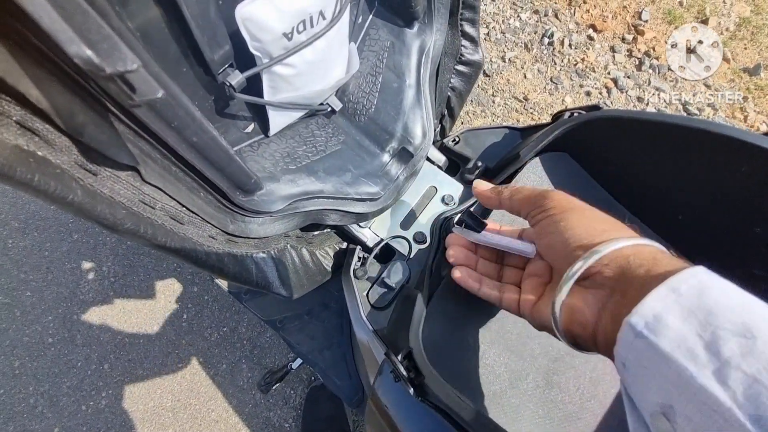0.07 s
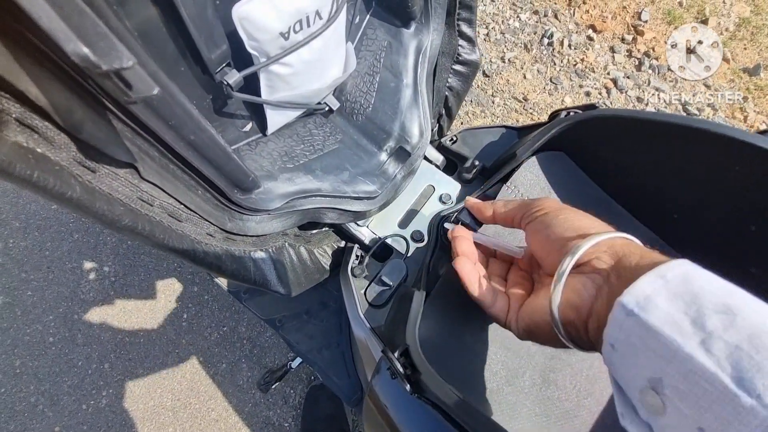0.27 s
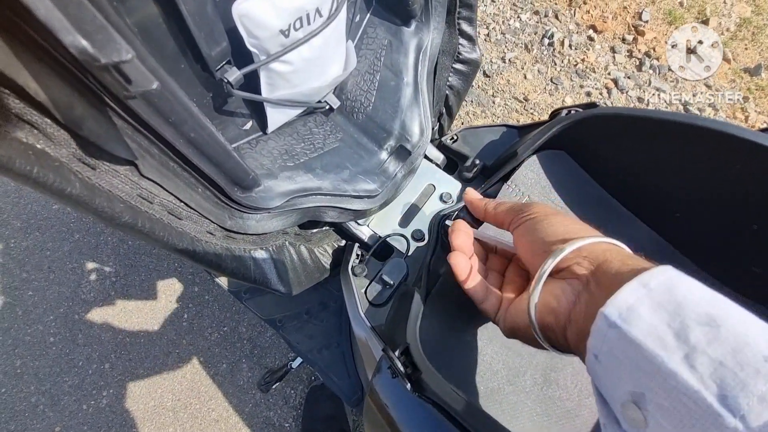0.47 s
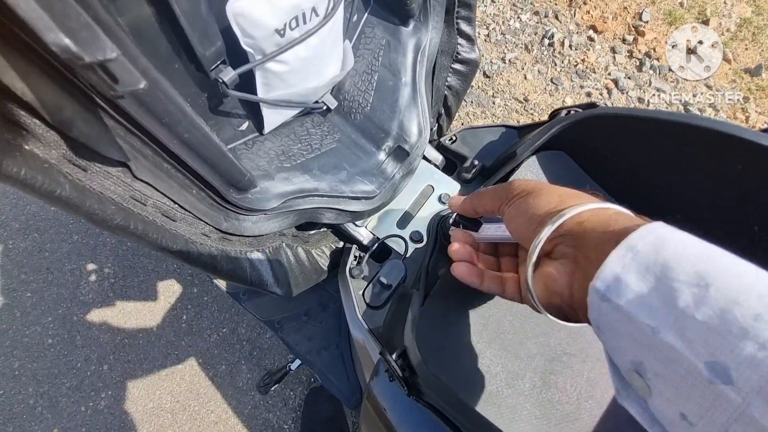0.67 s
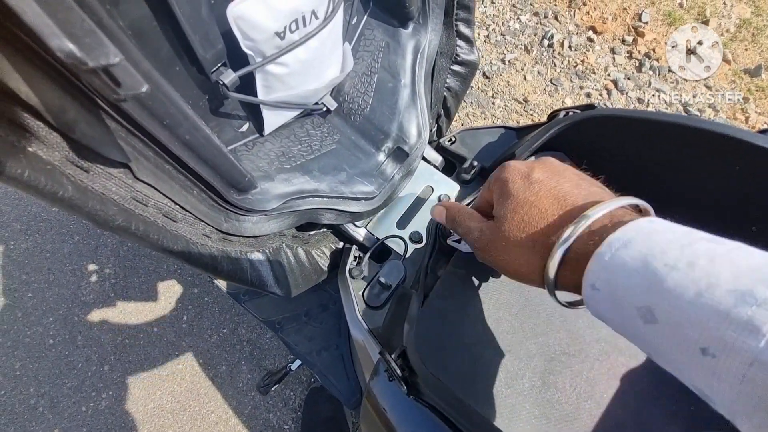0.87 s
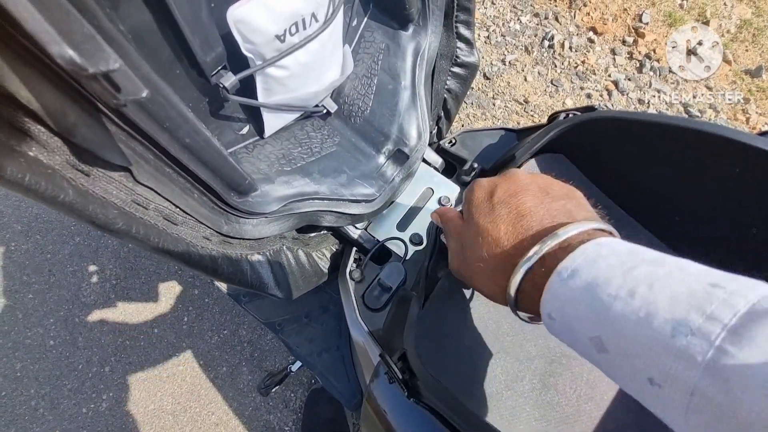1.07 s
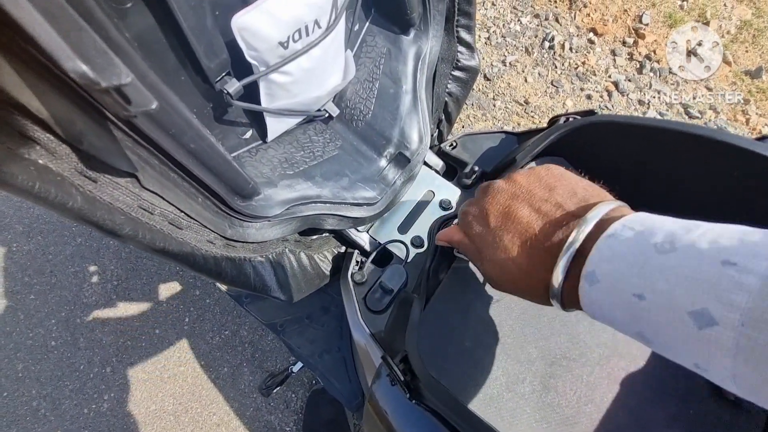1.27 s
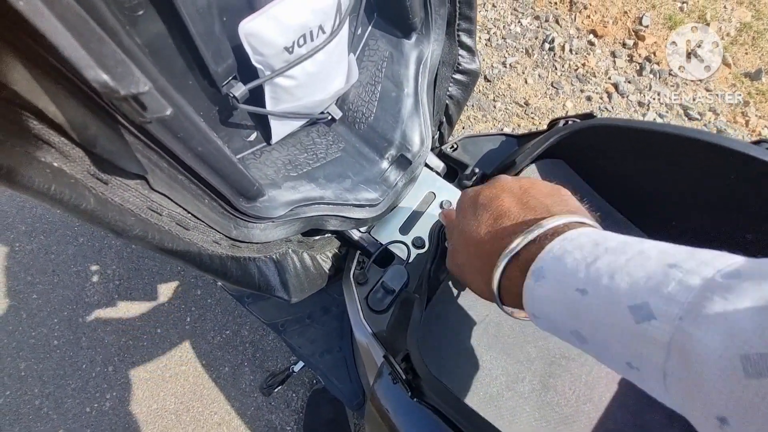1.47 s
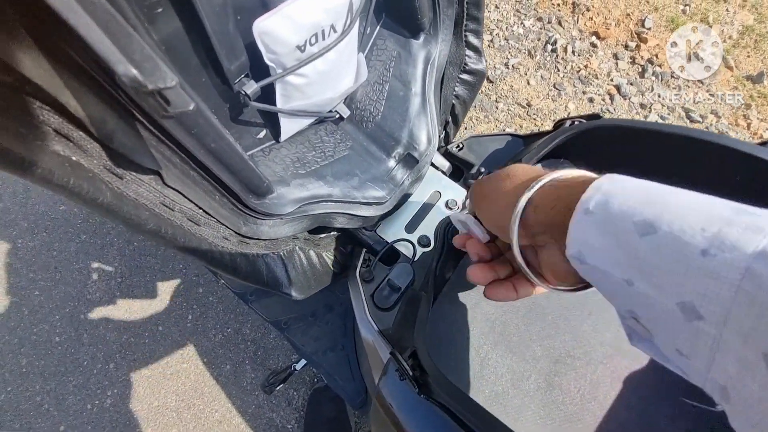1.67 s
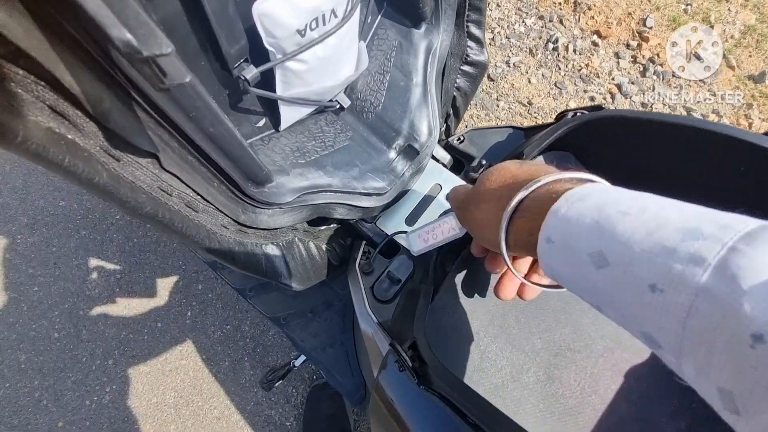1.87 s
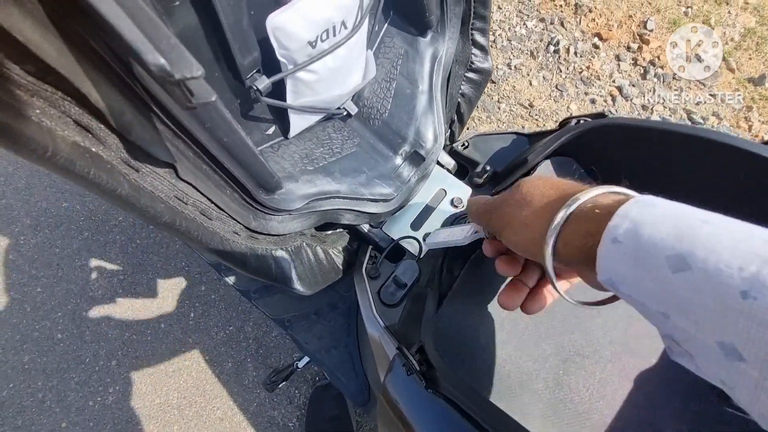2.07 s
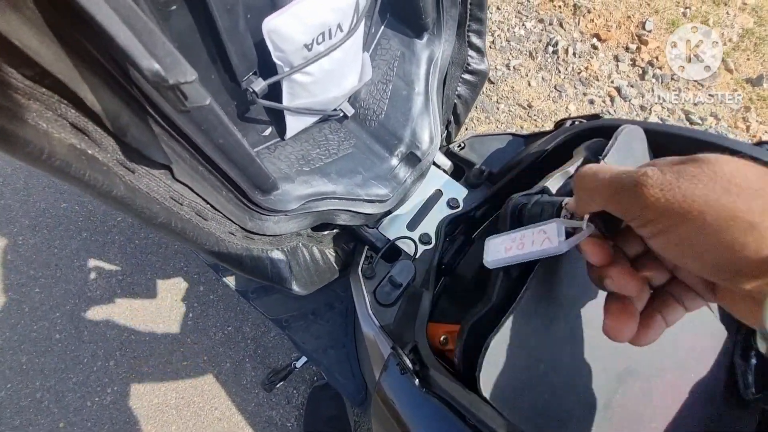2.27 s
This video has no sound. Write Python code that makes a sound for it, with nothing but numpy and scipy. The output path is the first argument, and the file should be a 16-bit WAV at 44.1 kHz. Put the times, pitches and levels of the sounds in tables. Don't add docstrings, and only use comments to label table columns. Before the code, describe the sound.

A metal key clicks and scrapes into a small lock on a scooter, each push thumping the hollow plastic box; it turns, slides out, and a latch clacks loudly near the end, close up outdoors over low traffic rumble.

```python
import sys
import numpy as np
from scipy import signal
from scipy.io import wavfile

SR = 44100
rng = np.random.default_rng(int(sys.argv[2]) if len(sys.argv) > 2 else 0)


def gain_from_db(level_db):
    decades = np.asarray(level_db, float) / 20
    return 10 ** decades


def output_pcm(signal):
    pcm = np.clip(np.atleast_2d(signal).T, -1, 1) * 32767
    wavfile.write(sys.argv[1], SR, np.round(pcm).astype(np.int16))


N = 102267
OPPOSITE = np.array([[1], [-1]])


def rms_one(x):
    return x / np.sqrt(np.mean(x ** 2) + 1e-20)


def at_hz(points, hz):
    table_hz, values = np.transpose(points)
    return np.interp(np.log(hz), np.log(table_hz), values)


def drift(rate_hz):
    step = 40
    warmup = 2000
    r = np.exp(-2 * step * np.pi * rate_hz / SR)
    white = rng.standard_normal(N // step + warmup + 2)
    slow = rms_one(signal.lfilter([1], [1, -2 * r, r * r], white)[warmup:])
    return np.interp(np.arange(N) / step, np.arange(len(slow)), slow)


def resonance(x, hz, width_hz):
    r = np.exp(-np.pi * width_hz / SR)
    feedback = [1, -2 * r * np.cos(2 * np.pi * hz / SR), r * r]
    return signal.lfilter([(1 - r * r) / 2, 0, (r * r - 1) / 2], feedback, x + 1e-18)


def bandpass(x, low_hz, high_hz, order=3):
    return signal.sosfilt(signal.butter(order, [low_hz, high_hz], "band", fs=SR, output="sos"), x)


def struck(start_s, rise_s, t60_s):
    i = int(start_s * SR)
    t = np.arange(min(N - i, int(t60_s * SR) + 200)) / SR
    shape = (1 - np.exp(-t / rise_s)) ** 2 * gain_from_db(-60 * t / t60_s)
    return slice(i, i + len(t)), t, shape / shape.max()


def swell(peak_s, rise_s, fall_s, bend):
    first = max(int((peak_s - 4 * rise_s) * SR), 0)
    n = np.arange(first, min(int((peak_s + 8 * fall_s) * SR), N))
    t = n / SR - peak_s
    return n, t, gain_from_db(-6 * np.where(t < 0, (t / rise_s) ** 2, (np.abs(t) / fall_s) ** bend))


def grains():
    grains_per_s = 14000
    sizes = gain_from_db(2.2 * np.minimum(rng.exponential(1, (3, N)), 4))
    left, right, shared = rng.standard_normal((3, N)) * sizes * (rng.random((3, N)) < grains_per_s / SR)
    return np.array([left, right]) + .5 * np.array([shared, np.roll(shared, 16)])


# pitch_hz, likeness (0 to 1)
SIDE_LIKENESS = [(40, .74), (290, .9), (640, .2), (1400, 0)]


def banded(white, spectrum, patchy_db):
    out = 0
    edges = np.append(25 * 2 ** np.arange(0, 9.1, .5), 17000)
    for k, (low, high) in enumerate(zip(edges, edges[1:])):
        mid, side = bandpass(white[k % 2], low, high, order=2)
        hz = np.sqrt(low * high)
        alike = np.clip(at_hz(SIDE_LIKENESS, hz), 0, 1)
        stereo = np.sqrt(1 + alike) * mid + np.sqrt(1 - alike) * side * OPPOSITE
        out = out + gain_from_db(at_hz(spectrum, hz) + patchy_db * drift(1.1)) * stereo
    return rms_one(out)


# pitch_hz, level_db (per Hz)
STREET_TONE = [(25, -6), (60, 8.5), (110, 2), (180, -23.5), (400, -11.5), (650, -54), (1500, -76),
               (16000, -33.5)]


def street(grip_change_db):
    rumble = banded(rng.standard_normal((2, 2, N)), STREET_TONE, patchy_db=1.0)
    return gain_from_db(-49 + 0.31 * grip_change_db) * rumble


def far_squeal():
    squeal_hz, width_hz, start_s, end_s, level_db = 2700, 12, .985, 1.2, -75
    t = np.arange(N) / SR
    on = np.clip((t - start_s) / .02, 0, 1) * np.clip((end_s - t) / .05, 0, 1)
    once = resonance(rng.standard_normal((2, N)), squeal_hz, width_hz)
    return gain_from_db(level_db) * on * rms_one(resonance(once, squeal_hz, width_hz))


def bird_chirp():
    middle_s, pitch_hz, rise_hz_per_s, level_db = 1.075, 4930, 10500, -80
    u = np.arange(N) / SR - middle_s
    turns = pitch_hz * u + rise_hz_per_s * u ** 2 / 2
    return gain_from_db(level_db) * np.exp(-(u / .065) ** 4) * np.sin(2 * np.pi * turns)


# pitch_hz, level_db (per Hz)
RUSTLE_TONE = [(600, 7), (1300, 0), (2700, -3.5), (7500, -8.5), (15500, -19)]


def hand_rustle(grip_db):
    rub = banded(rng.standard_normal((2, 2, N)), RUSTLE_TONE, patchy_db=-1.0)
    return gain_from_db(4.5 + grip_db) * rms_one(bandpass(rub, 500, 17000, order=2))


def hand_creak(grip_change_db):
    return gain_from_db(0.56 * grip_change_db - 54.5 + 1.0 * drift(25))


# start_s, length_s, level_db, bright_db (added to the bright part)
SCRAPE_STROKES = [(0, 0.2, -49, -16), (0.119, 0.077, -46, 9), (0.297, 0.053, -57, 10.5),
                  (0.939, 0.067, -46.5, 7.5), (1.276, 0.039, -34.5, 5.5), (1.942, 0.089, -34.5, 4),
                  (2.137, 0.086, -35, 10)]
# pitch_hz, level_db (per Hz)
SLIDE_TONE = [(700, 6), (2400, -0.5), (7000, -15.5), (15500, -25)]


def scrapes():
    t = np.arange(N) / SR
    dull_level, bright_level = np.zeros(N), np.zeros(N)
    for start_s, length_s, db, bright_db in SCRAPE_STROKES:
        fade_in = np.clip((t - start_s) / 0.0024, 0, 1)
        fade_out = np.clip((start_s + length_s - t) / 0.026, 0, 1)
        weaken_db = -15.4 * np.clip((t - start_s) / length_s, 0, 1)
        stroke = gain_from_db(db + weaken_db) * fade_in * fade_out
        dull_level += stroke
        bright_level += gain_from_db(bright_db) * stroke
    slide = banded(np.array([grains(), grains()]), SLIDE_TONE, patchy_db=2.0)
    split_hz = 3200
    dull = signal.sosfilt(signal.butter(2, split_hz, fs=SR, output="sos"), slide)
    bright = signal.sosfilt(signal.butter(2, split_hz, "high", fs=SR, output="sos"), slide)
    return gain_from_db(2.0 * drift(150)) * (dull_level * dull + bright_level * bright)


# pitch_hz, first_blow_db, second_blow_db, t60_s
LATCH_MODES = [(823, -3.5, -6.5, 0.029), (1063, -8.5, -4, .03), (1550, -10, -2, 0.028),
               (1717, 1.5, 3.5, 0.019), (2000, 5.5, -2, 0.013), (2700, -12.5, -16.5, 0.036)]
# hit_s, level_db
LATCH_BLOWS = [
    (2.1405, -7),
    (2.1552, -7),
]


def latch():
    out = np.zeros((2, N))
    for hz, *levels_db, t60_s in LATCH_MODES:
        for (hit_s, db), level_db in zip(LATCH_BLOWS, levels_db):
            span, t, shape = struck(hit_s - .0015, .0016, t60_s)
            side_db = rng.normal(0, 2.4, (2, 1))
            turns = hz * t + rng.random()
            lag_turns = np.array([[0], [rng.uniform(0.081, 0.42)]])
            ring = np.sin(2 * np.pi * (turns + lag_turns))
            out[:, span] += gain_from_db(db + level_db - 7.0 + side_db) * shape * ring
    return out * gain_from_db([[-1.5], [1.5]])


# peak_s, plastic_db, lock_db, blade_db,
# length_s
KEY_TICKS = [(0.048, -48, -69, -73, 0.0018), (0.079, -47, -61, -76, 0.003),
             (0.1193, -54, -53, -56, 0.0041), (0.1269, -55, -44, -62, 0.0016),
             (0.1405, -49, -44.5, -48, 0.003), (0.147, -35, -43.5, -37, 0.0038),
             (0.2736, -55, -56.5, -62, 0.0032), (0.2901, -84, -76, -57, 0.0046),
             (0.5975, -46, -53, -60.5, 0.0037), (0.606, -61, -76, -76, 0.0016),
             (0.6656, -54.5, -32.5, -23, 0.0014), (0.7318, -45.5, -51, -72, 0.0021),
             (0.8814, -72, -60, -62, 0.0028), (0.9086, -41.5, -40.5, -51, 0.0013),
             (0.9195, -47, -63, -66, 0.009), (0.9298, -44, -45.5, -49, 0.0037),
             (0.9404, -52, -49, -57, 0.0023), (0.95, -44, -50.5, -53, 0.0069),
             (1.1188, -46.5, -74, -77, 0.0051), (1.2083, -38, -65, -57.5, 0.0031),
             (1.27, -59, -49, -44, 0.0022), (1.2775, -37.5, -43, -34, 0.0038),
             (1.293, -32, -31, -28.5, 0.0032),
             (1.522, -46, -87, -70, 0.0051), (1.5565, -45, -53.5, -55, 0.011),
                 (1.5785, -53, -60, -44.5, 0.0031), (1.599, -52.5, -66, -57, 0.018),
                 (1.6314, -43, -53.5, -50, 0.0033), (1.647, -56, -57, -54, 0.0068),
                 (1.6838, -60, -48, -54.5, 0.0014), (1.688, -51, -57.5, -56, 0.0052),
                 (1.699, -40.5, -59, -59, 0.0032), (1.7453, -47, -54.5, -58, 0.0037),
                 (1.7872, -46.5, -51, -69, 0.0027), (1.8474, -47.5, -74, -74, 0.0047),
                 (1.8815, -49, -41.5, -34, 0.0024), (1.8983, -45, -50, -40, 0.002),
                 (1.9036, -37.5, -45, -31.5, 0.00085), (1.9092, -57, -52, -43, 0.0019),
                 (1.9184, -47, -51, -55, 0.0036), (1.946, -30, -36.5, -41, 0.0073),
                 (1.9703, -33.5, -50, -58, 0.002), (1.9781, -41, -37, -40, 0.0023),
                 (1.9916, -58, -40, -45, 0.0013), (1.999, -43, -44, -53, 0.0022),
                 (2.0084, -60, -36.5, -38, 0.0019), (2.0844, -36, -67, -63, 0.0016),
                 (2.0898, -35.5, -72, -73, 0.0034), (2.1054, -39.5, -43, -45, 0.0053),
                 (2.1178, -31.5, -53, -59.5, 0.0045), (2.1418, -14.5, -22, -18.5, 0.0031),
                 (2.1554, -19.5, -23.5, -23, 0.004), (2.1825, -33, -41, -50, 0.0057),
                 (2.203, -43, -44, -43, 0.011),
             (0.6611, -38.5, -47, -28.5, 0.0025), (0.6702, -40, -45, -56, 0.0019),
                (1.2888, -25.5, -39.5, -27, 0.0035), (1.8945, -46, -43.5, -58, .002),
                (1.9415, -41, -38, -48, 0.0024)]
# low_hz, high_hz, length_share, left_over_right_db
TICK_PARTS = [
    (583, 2270, 1.42, 0.5),
    (2510, 5680, 0.99, 7.5),
    (6500, 14300, 0.71, 1),
]
# pitch_hz, width_hz, level_db
PANEL_MODES = [(843, 224, 10), (1157, 610, -6), (2294, 400, -4.5)]


def ticks():
    out, rub = 0, grains()
    for k, (low_hz, high_hz, share, left_db) in enumerate(TICK_PARTS):
        level = np.zeros(N)
        for peak_s, *parts_db, length_s in KEY_TICKS:
            span, _, shape = swell(peak_s, 0.0012, share * max(length_s, .001), bend=1.24)
            level[span] += gain_from_db(parts_db[k] - 1.5) * shape
        both = bandpass([rub * level, rub], low_hz, high_hz)
        if k == 0:
            panel = sum(gain_from_db(db) * resonance(both, hz, width_hz) for hz, width_hz, db in PANEL_MODES)
            both = .18 * both + panel
        burst, steady = both
        out = out + burst / np.std(steady) * gain_from_db([[left_db / 2], [-left_db / 2]])
    return out


# pitch_hz, width_hz, level_db
BOX_MODES = [(240.3, 25.3, 0), (331.4, 83.6, -6.5), (368.2, 41, -2), (427, 36.7, -6)]


def box_noise():
    noises = []
    for force in rng.standard_normal((2, N)):
        ring = 0
        for k, (hz, width_hz, db) in enumerate(BOX_MODES):
            ring = ring + (-1) ** k * gain_from_db(db) * resonance(force, hz, width_hz)
        noises.append(rms_one(ring))
    return noises


# peak_s, level_db, pitch_hz, length_s
PUSHES = [(0.0534, -30, 373, 0.0043), (0.088, -37.5, 292, 0.0078), (0.1354, -27, 300, 0.0021),
          (0.1561, -28, 318.4, 0.0077), (0.166, -30, 212, 0.0094), (0.2595, -41, 384, 0.006),
          (0.2796, -25, 311, 0.0022), (0.3493, -34, 260, 0.0032), (0.606, -15.5, 268, 0.0059),
          (0.6647, -38.5, 362, 0.013), (0.6976, -24, 260, 0.015), (0.7345, -26, 299, 0.0028),
          (0.8162, -45, 280, 0.0063), (0.8578, -45, 356, 0.0022), (0.8783, -36.5, 263, 0.0036),
          (0.9116, -32.5, 283, 0.0086), (0.9347, -23.5, 359, 0.0061), (0.9554, -23, 305, 0.0044),
          (0.9715, -35.5, 276, 0.0076), (1.04, -33, 284, 0.003), (1.1054, -35, 323, 0.0023),
          (1.1206, -34, 340, 0.0047), (1.2121, -21.5, 294, 0.0033), (1.2301, -40, 343, 0.0024),
          (1.2907, -13, 364, 0.003), (1.3083, -16.5, 255.6, 0.0073), (1.3543, -37.5, 352, 0.0017),
              (1.3997, -40, 281.5, 0.002), (1.4845, -34.5, 278, 0.0065), (1.5093, -32.5, 227, 0.0072),
              (1.5334, -16.5, 256, 0.017), (1.572, -22.5, 248, 0.0012), (1.5837, -25.5, 244, 0.0098),
              (1.6043, -28.5, 272, 0.0097), (1.6314, -36, 303, 0.0042), (1.6615, -39, 274, 0.0028),
              (1.687, -32.5, 307, 0.0036), (1.7015, -33, 272, 0.0041), (1.742, -43, 294, 0.002),
              (1.757, -44, 300, 0.0037), (1.796, -33.5, 308, 0.0048), (1.8502, -15, 335, 0.0018),
              (1.865, -24.5, 300, 0.0039), (1.8754, -31, 290, 0.0051), (1.905, -40.5, 394, 0.024),
              (1.9457, -23.5, 390, 0.0032), (1.962, -29, 336, 0.0052), (1.9886, -34.5, 276, 0.0071),
              (2.0114, -36.5, 360, 0.0025), (2.0903, -24, 370, 0.0035), (2.1076, -30, 264, 0.007),
              (2.121, -36, 290, 0.0027), (2.1477, -12, 278, 0.0047), (2.16, -12, 265.7, 0.0089),
              (2.178, -51, 264, 0.0038), (2.229, -49, 292, 0.0018)]


def thumps(grip_change_db):
    tone, shake = np.zeros(N), np.zeros(N)
    phases = rng.uniform(0, 2 * np.pi, 60)
    for (peak_s, db, hz, length_s), phase in zip(PUSHES, phases):
        span, t, shape = swell(peak_s, 0.0018 + 0.44 * length_s, max(length_s, .002), bend=1.46)
        tone[span] += gain_from_db(db - 0.5) * shape * np.sin(2 * np.pi * hz * t + phase)
        shake[span] += gain_from_db(db - 9) * shape
    mid, side = box_noise()
    creak = hand_creak(grip_change_db)
    middle = tone + (shake + creak) * mid
    difference = gain_from_db(-17) * (2 * shake + creak) * side
    return bandpass(middle + difference * OPPOSITE, 130, 520)


# time_s, level_db
HAND_GRIP = [(0, -70.5), (.38, -73), (.44, -82), (.58, -85.5), (.62, -68), (1.05, -75), (1.3, -65.5),
             (1.6, -64), (1.79, -60.5), (1.81, -77), (1.86, -59.5), (2.22, -60), (2.26, -66.5)]


def scene():
    grip_db = np.interp(np.arange(N) / SR, *np.transpose(HAND_GRIP))
    grip_change_db = grip_db - grip_db.mean()
    around = hand_rustle(grip_db) + street(grip_change_db)
    key = thumps(grip_change_db) + ticks() + scrapes()
    return around + key + latch() + far_squeal() + bird_chirp()


def band_limit(x):
    return signal.sosfilt(signal.butter(12, 16720, fs=SR, output="sos"), x)


def record(dry):
    rounded = np.tanh(dry)
    cut = signal.sosfilt(signal.cheby2(20, 27, 15720, fs=SR, output="sos"), rounded)
    return band_limit(cut)


dry = scene()
out = record(dry)
output_pcm(out)
```